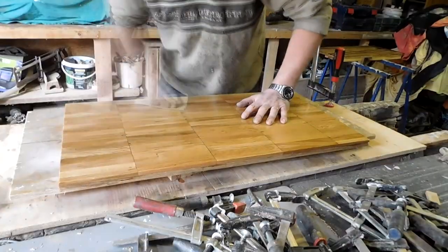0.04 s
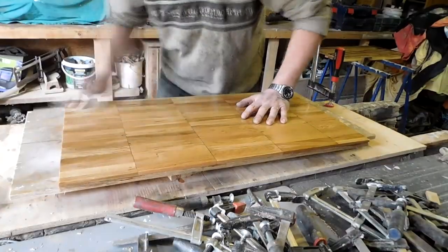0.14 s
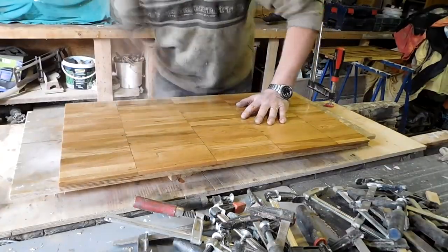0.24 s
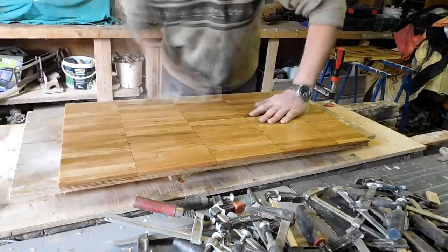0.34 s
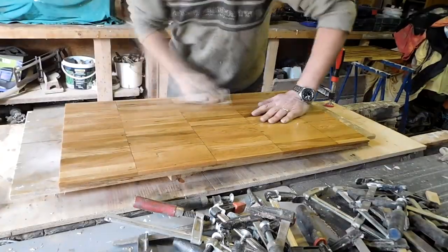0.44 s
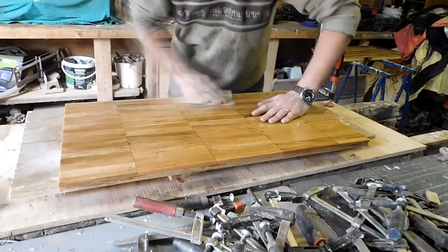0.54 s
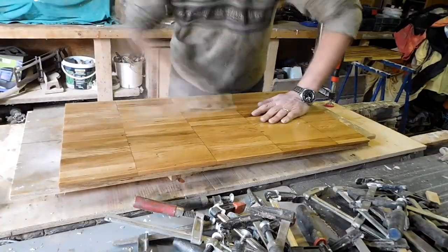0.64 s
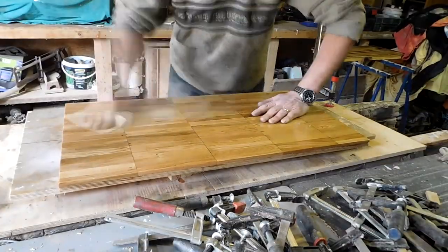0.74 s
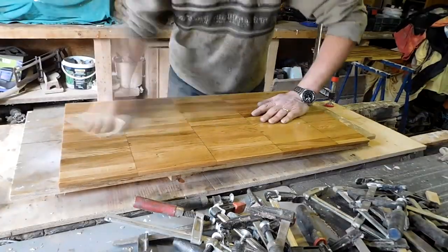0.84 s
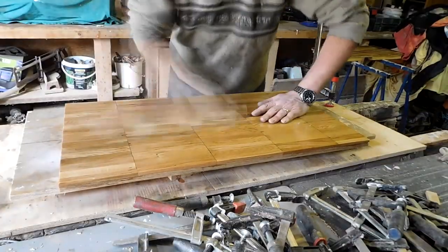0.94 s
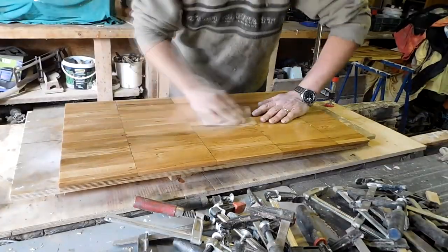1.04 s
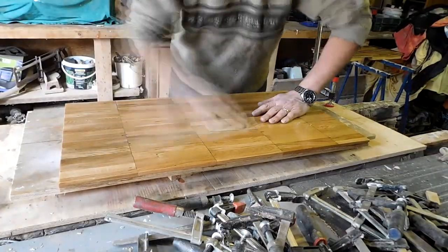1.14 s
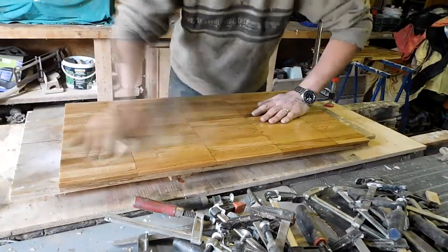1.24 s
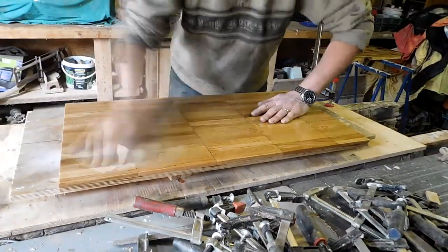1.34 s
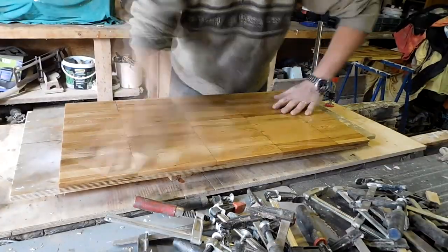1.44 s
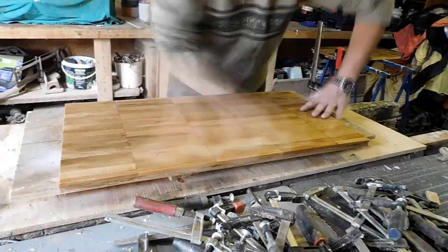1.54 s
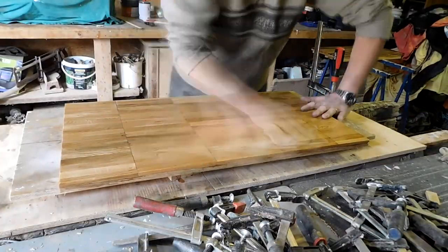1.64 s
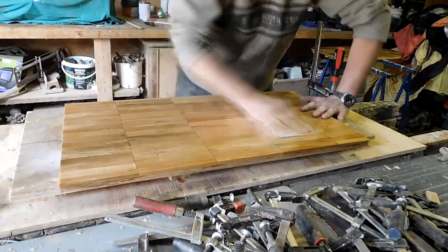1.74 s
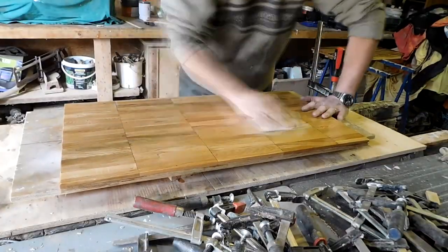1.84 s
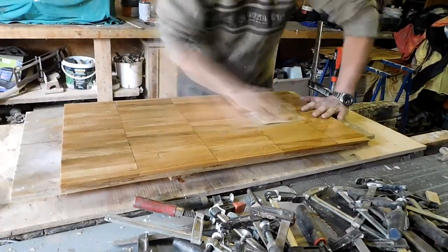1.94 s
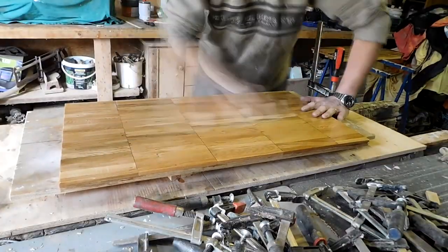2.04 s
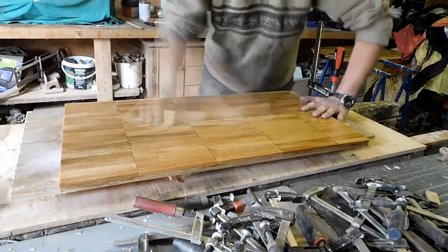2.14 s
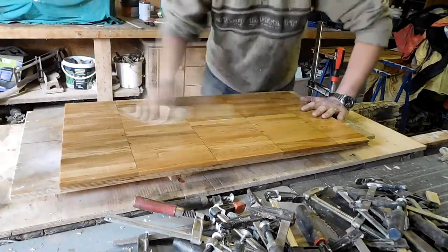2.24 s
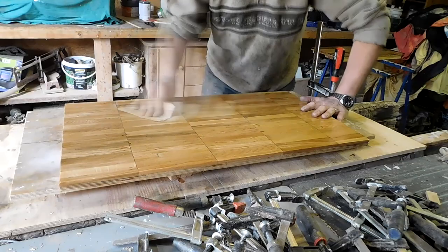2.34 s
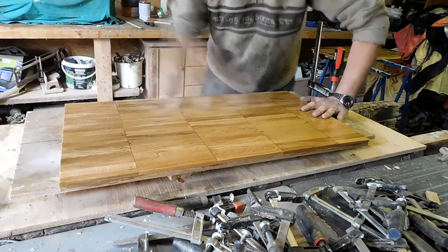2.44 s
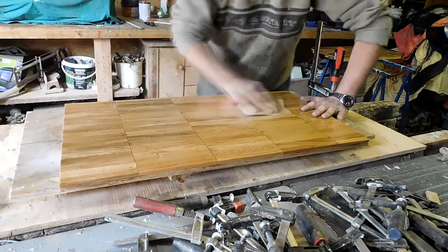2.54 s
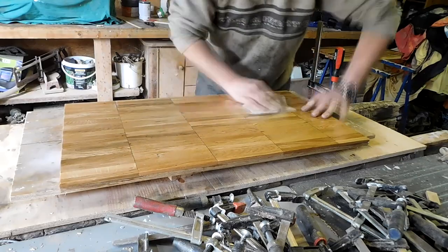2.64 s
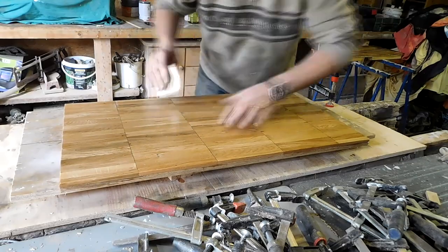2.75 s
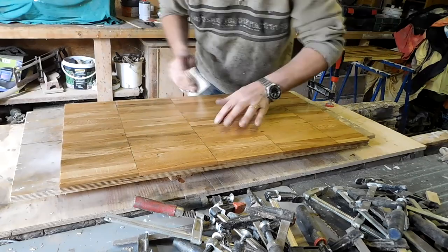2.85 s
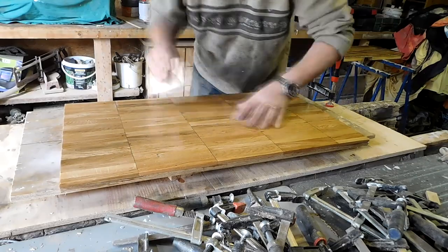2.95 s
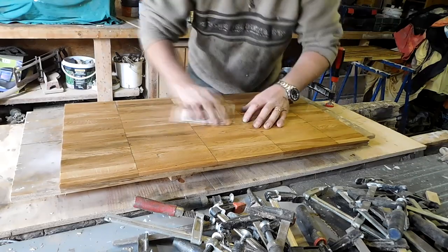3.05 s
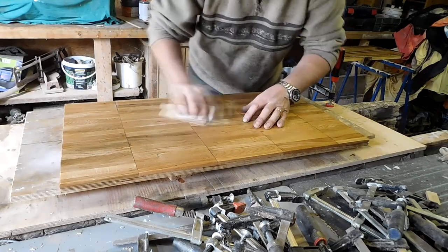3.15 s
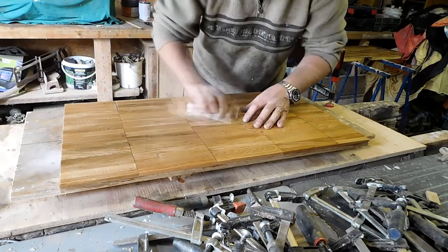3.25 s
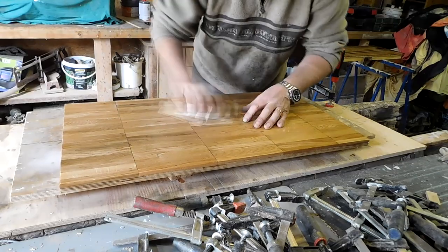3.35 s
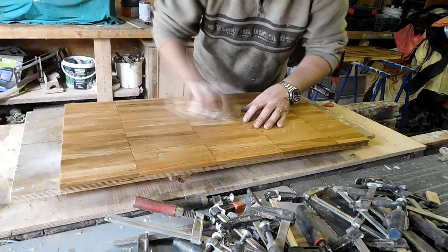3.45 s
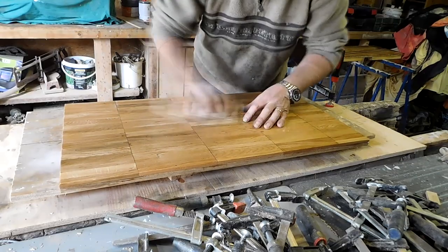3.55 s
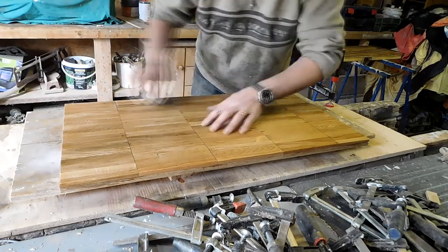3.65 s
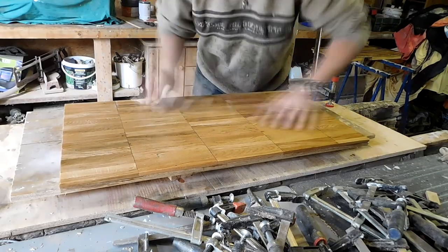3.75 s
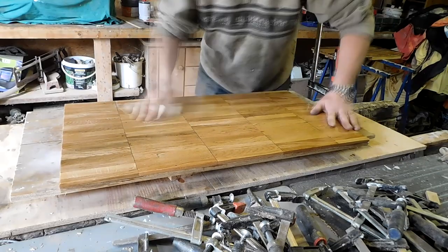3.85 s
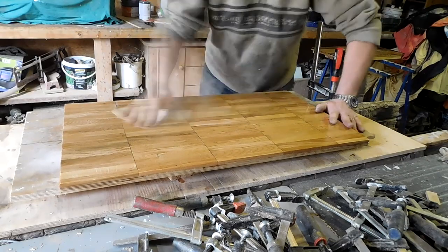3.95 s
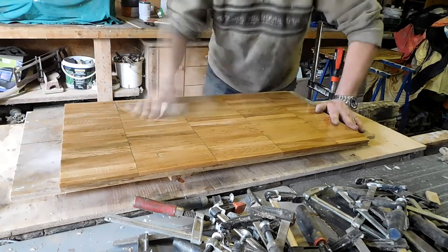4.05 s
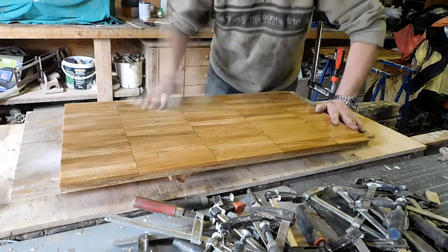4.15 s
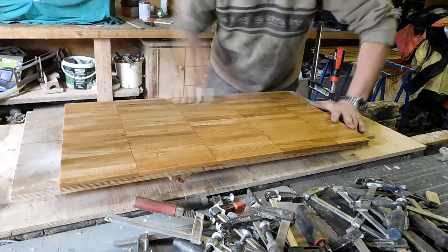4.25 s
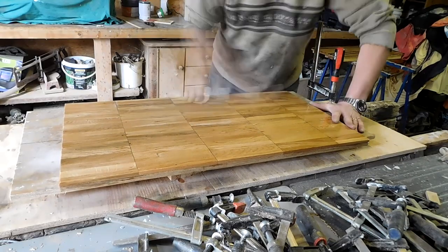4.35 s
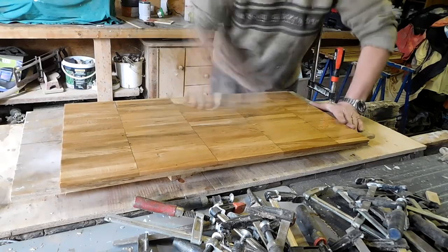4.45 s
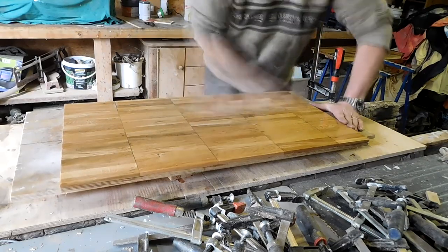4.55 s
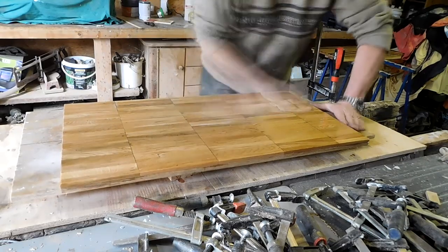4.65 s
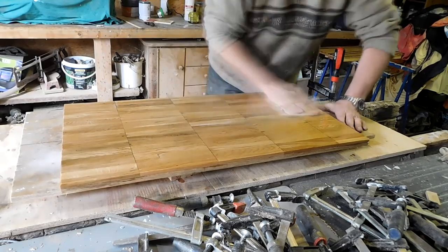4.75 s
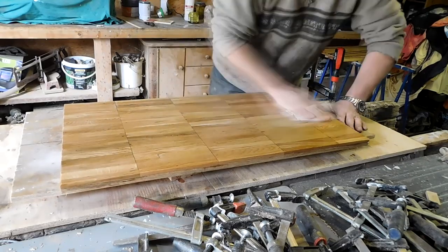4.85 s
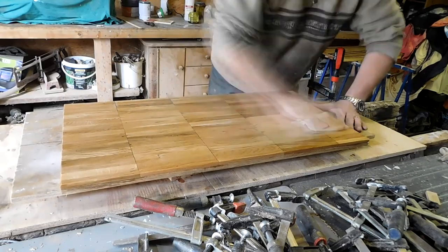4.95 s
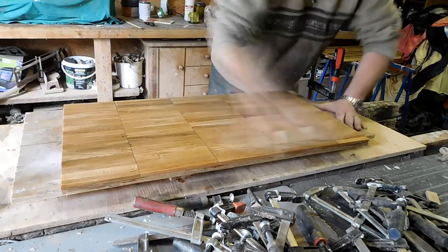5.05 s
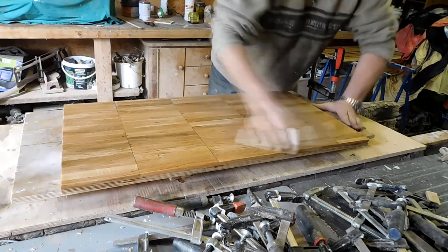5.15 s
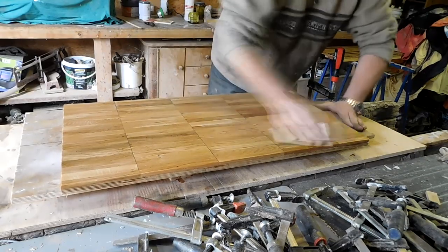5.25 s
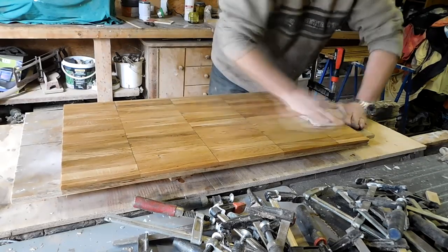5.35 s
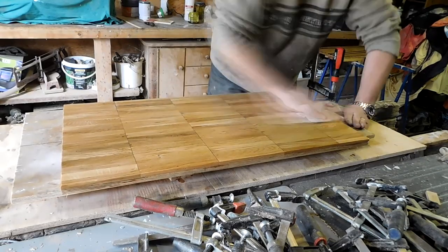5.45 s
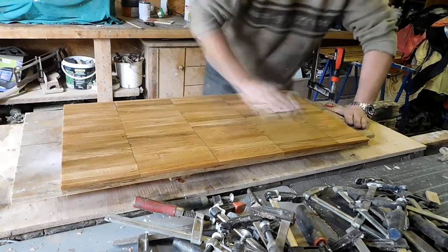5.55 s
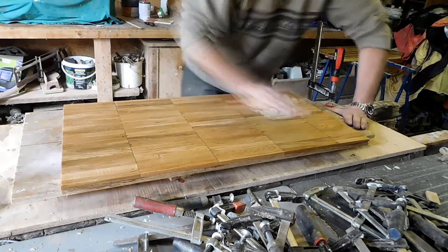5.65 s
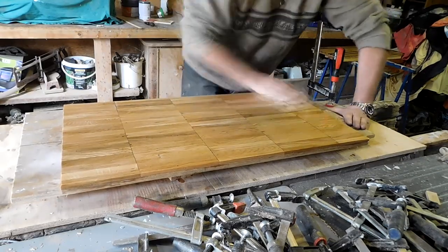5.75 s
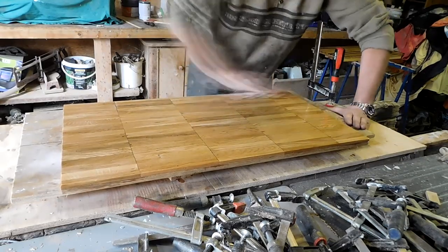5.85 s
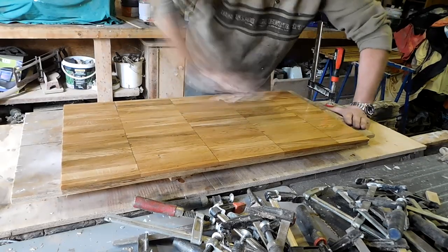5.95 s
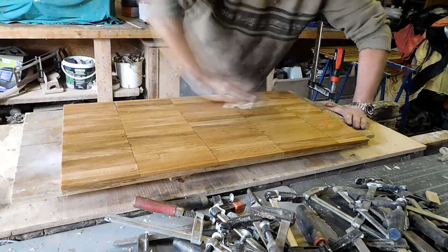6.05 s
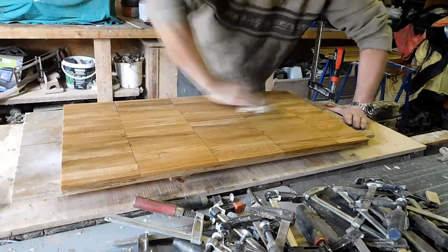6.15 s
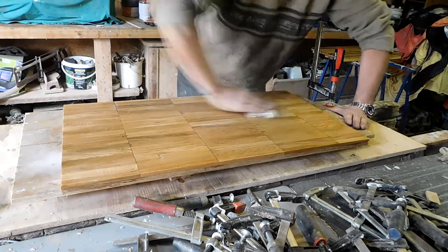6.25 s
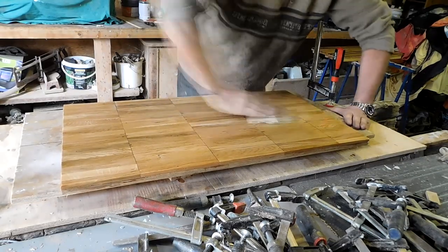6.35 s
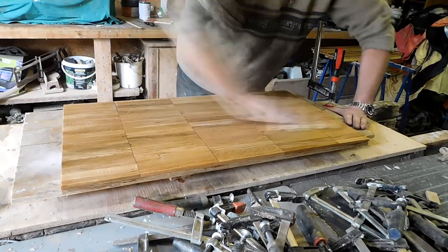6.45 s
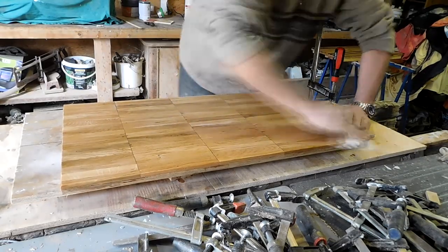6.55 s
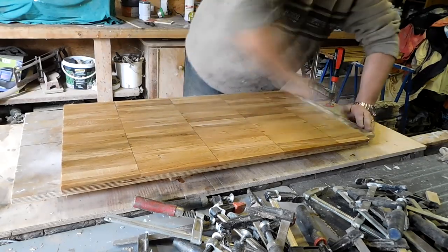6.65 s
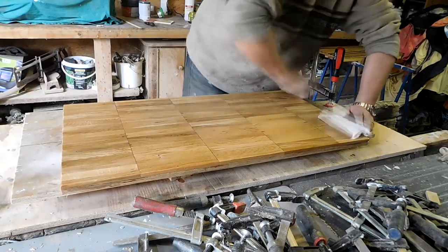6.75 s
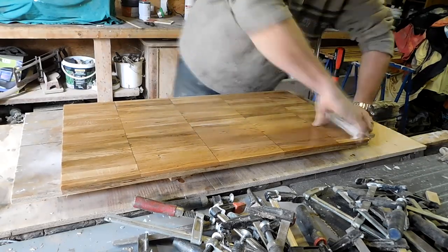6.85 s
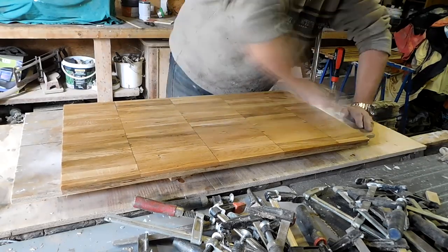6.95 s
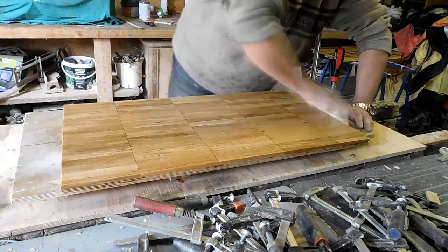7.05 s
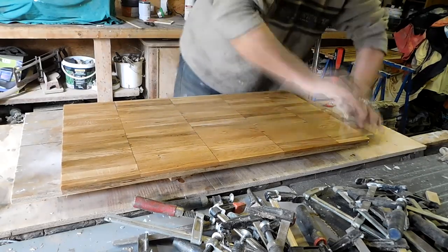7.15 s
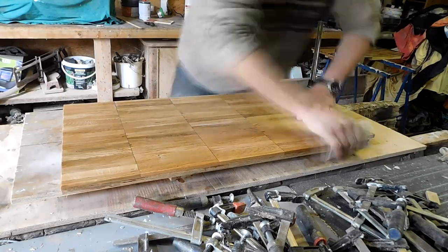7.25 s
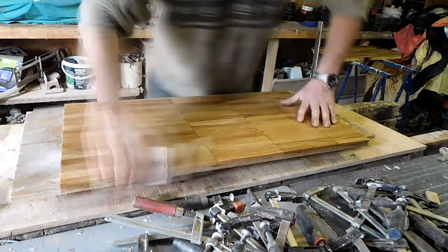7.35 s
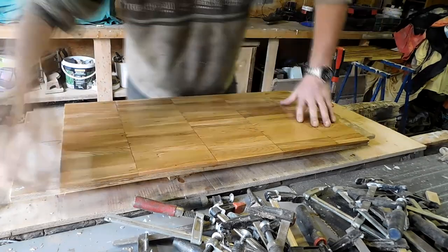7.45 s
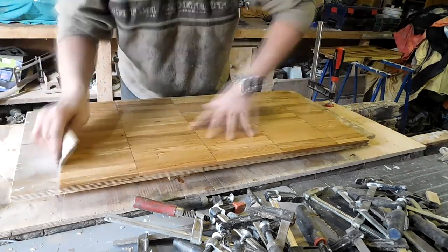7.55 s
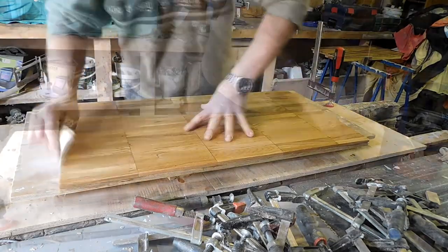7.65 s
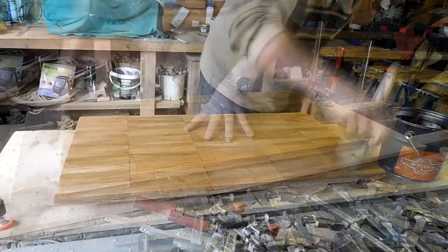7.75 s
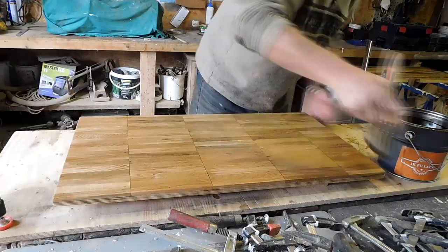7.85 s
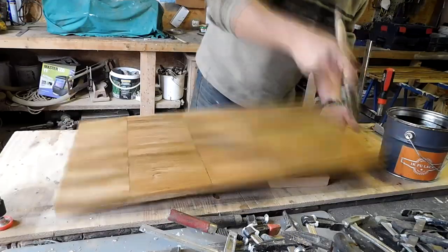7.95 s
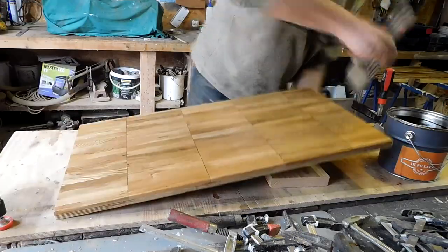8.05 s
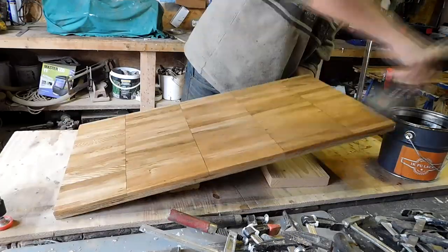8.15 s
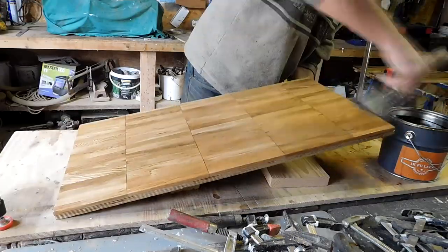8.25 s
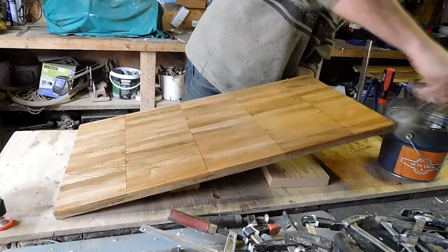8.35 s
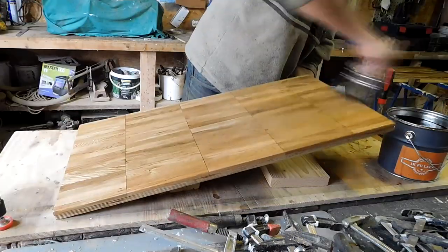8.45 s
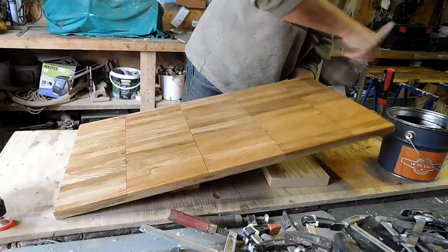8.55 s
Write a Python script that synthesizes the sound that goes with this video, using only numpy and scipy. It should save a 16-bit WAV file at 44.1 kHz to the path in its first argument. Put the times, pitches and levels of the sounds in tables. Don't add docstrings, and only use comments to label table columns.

```python
import sys
import numpy as np
from scipy import signal
from scipy.io import wavfile
from scipy.ndimage import uniform_filter1d

SR = 44100
rng = np.random.default_rng(int(sys.argv[2]) if len(sys.argv) > 2 else 0)


def master(y):
    cut = np.clip(np.atleast_2d(y).T, -1, 1)
    pcm = np.round(cut * 32767)
    wavfile.write(sys.argv[1], SR, pcm.astype(np.int16))


def amplitude_ratio(level_db):
    exponent = np.asarray(level_db, float) / 20
    return 10 ** exponent


N = 379260
HOP, SIZE = 64, 512
HZ = np.fft.rfftfreq(SIZE, 1 / SR)[:, None]
FRAME_S = np.arange(N // HOP + 2) * HOP / SR

# pitch_hz, likeness_0_to_1
LIKENESS = [(60, 0.85), (180, 0.28), (550, 0.53), (1650, 0.62), (4970, 0.62), (15000, 0.27)]


def evened(x):
    return x / np.sqrt(np.mean(np.abs(x) ** 2) + 1e-20)


def read(points):
    hz, value = np.transpose(points)
    return np.interp(np.log(HZ + 1), np.log(hz + 1), value)


def band_db(shape_db, lo_hz, hi_hz):
    in_band = (HZ > lo_hz) & (HZ < hi_hz)
    power = (amplitude_ratio(shape_db)[in_band] ** 2).sum() / len(HZ)
    return shape_db - 10 * np.log10(power)


def patches(patchy_db, wide_bins, long_frames):
    blotches = rng.standard_normal((len(HZ), len(FRAME_S)))
    blotches = uniform_filter1d(blotches, int(wide_bins), axis=0)
    blotches = uniform_filter1d(blotches, int(long_frames), axis=1)
    return patchy_db * evened(blotches)


def pair(field_db, likeness, lag_samples, spread_db):
    click_db = spread_db * np.minimum(rng.exponential(1, N), 3)
    clicks = evened(rng.standard_normal((2, N)) * amplitude_ratio(click_db))
    shared, own = signal.stft(clicks, nperseg=SIZE, noverlap=SIZE - HOP)[2]
    frames = shared.shape[1]
    likeness = np.clip(likeness, 0, 1)
    delay = np.exp(-2j * np.pi * HZ / SR * lag_samples)[:, :frames]
    left = shared * delay
    right = likeness * shared + np.sqrt(1 - likeness ** 2) * own
    coloured = np.array([left, right]) * amplitude_ratio(field_db)[..., :frames]
    return signal.istft(coloured, nperseg=SIZE, noverlap=SIZE - HOP)[1][:, :N]


def scrubbing():
    # turn_s, strokes_that_follow (0 = run ends)
    pace = [(0.0, 6), (0.227, 2), (0.314, 12), (0.845, 18), (1.595, 1), (1.654, 15), (2.341, 9), (2.738, 0),
            (3.24, 11), (3.615, 0), (3.881, 5), (4.135, 5), (4.376, 10), (4.841, 4), (5.026, 6), (5.288, 1),
            (5.366, 7), (5.628, 1), (5.734, 0), (5.785, 1), (5.885, 1), (5.958, 13), (6.561, 0)]
    # start_s, top_speed_hiss_db, turn_dip_db, far_turn_extra_dip_db, panel_db
    effort = [(0, -38.5, 3, 1, -45), (.27, -35.5, 7.5, -1.5, -48.5), (.6, -36.5, 8.5, 0.5, -47.5),
              (1.0, -37.5, 7.5, 0.4, -49.5), (1.55, -38, 8, -0.5, -50), (2.0, -36, 9, -0.5, -48),
              (2.7, -37, 8.5, 1, -50.5), (3.24, -49, 2, 0.5, -53), (3.6, -46, 10.5, 0, -54),
              (3.9, -34, 8.5, -1.5, -46), (4.35, -38.5, 7, -4, -51.5), (4.7, -39, 7, 0.5, -49.5),
              (4.9, -36.5, 7, -3.5, -51), (5.2, -43, 6, 0.5, -52), (5.4, -45.5, 9, 0, -54),
              (5.7, -42.5, 3, -0.5, -49), (6.15, -45, 7.5, 0, -53), (6.55, -45.5, 2.5, 0, -52.5)]
    far_early_s = 0.0032
    push_early = 0.041
    stroke_db, push_hiss_db, push_panel_db = 1, 0.8, 0.5

    runs = [np.linspace(start_s, end_s, count, endpoint=False)
            for (start_s, count), (end_s, _) in zip(pace, pace[1:])]
    turn_s = np.concatenate(runs)
    effort_s, *columns = np.transpose(effort)
    top_db, dip_db, far_db, panel_db = (np.interp(turn_s, effort_s, c) for c in columns)
    odd = -(-1.) ** np.arange(len(turn_s))
    chance_db = stroke_db * rng.standard_normal((3, len(turn_s)))
    push = np.clip(odd * far_db, -1, 1)
    return [turn_s - far_early_s * push * (turn_s > 0),
            top_db - dip_db - odd * far_db + chance_db[0],
            0.5 - push_early * push,
            top_db + push_hiss_db * push + chance_db[1],
            panel_db + push_panel_db * push + chance_db[2]]


def stroke_levels():
    # turn_s, turn_hiss_db,
    # top_speed_place_0_to_1, top_speed_hiss_db, panel_db
    wipes_and_lifts = [
        (2.738, -55, 0.28, -45.5, -55.5),
        (2.815, -82, 0.6, -96, -91),
        (3.04, -94, 0.54, -49.5, -49),
        (3.1, -64, 0.66, -53, -50),
        (3.145, -54, 0.63, -43.5, -46),
        (3.205, -47, 0.7, -42.5, -43.5),
        (3.615, -48.5, 0.34, -44, -55.5),
        (3.685, -71, .1, -71, -65.5),
        (3.748, -85, .8, -76, -68),
        (3.805, -79, 0.59, -38, -46.5),
                       (5.734, -46.5, 0.4, -45, -44.5), (6.561, -51, 0.24, -48, -52.5),
             (6.622, -56.5, 0.74, -41.5, -46.5), (6.717, -49.5, .42, -41.5, -48),
             (6.77, -49.5, 0.39, -45.5, -50), (6.85, -71, .5, -73, -64.5), (6.9, -74, 0.37, -61, -59.5),
             (6.961, -69, 0.69, -39, -45), (7.081, -46.5, 0.4, -39.5, -49.5),
             (7.131, -42.5, .4, -39.5, -49), (7.205, -62, .4, -63, -62), (7.252, -75, 0.37, -48, -46.5),
             (7.309, -71, 0.9, -38.5, -47), (7.36, -39, .45, -34.5, -49), (7.426, -45, .5, -40.5, -50.5),
             (7.472, -49.5, 0.46, -37.5, -46.5), (7.55, -61.5, 0.9, -52, -52),
             (7.625, -58, 0.63, -46, -47.5), (7.68, -55.5, .47, -44.5, -46.5), (7.739, -53, .4, -47, -49),
             (7.774, -50.5, 0.43, -39.5, -47), (7.875, -75, .3, -75, -67)]
    # turn_s, turn_hiss_db, top_speed_place_0_to_1, top_speed_hiss_db, panel_db
    brushes = [
        (7.97, -81, 0.6, -74, -62),
        (8.035, -76, .4, -56, -48),
        (8.115, -75, .2, -75, -67),
        (8.176, -78, 0.4, -72, -69.5),
        (8.299, -88, 0.6, -74, -73),
        (8.415, -86, 0.45, -77, -70.5),
        (8.5, -81, .3, -80, -72),
        (8.545, -82, 0.44, -60.5, -64.5),
    ]
    rows = np.hstack([scrubbing(), np.transpose(wipes_and_lifts + brushes)])
    turn_s, turn_db, place, top_db, panel_db = rows[:, np.argsort(rows[0])]
    length_s = np.diff(turn_s, append=N / SR + 0.02)
    top_s = turn_s + np.clip(place, 0.1, 0.9) * length_s
    knots_s = np.append(np.ravel([turn_s, top_s], "F"), N / SR + 0.017)
    step = np.interp(FRAME_S, knots_s, np.arange(len(knots_s)))
    stroke = step.astype(int) // 2
    slowing = step.astype(int) % 2
    end_db = np.append(turn_db, -72)[stroke + slowing]
    speed = np.abs(np.sin(np.pi / 2 * step)) ** 1.37
    dip_db = (top_db[stroke] - end_db) * (1 - speed)
    panel_db = panel_db[stroke] + 0.3 - np.maximum(0.67 * dip_db, dip_db - 22.0)
    return top_db[stroke] - dip_db, np.clip(dip_db, 0, 12), uniform_filter1d(panel_db, size=12)


def sanding():
    # start_s, treble_tilt_db_per_octave, paper_ring_db, palm_weight_db
    touch = [(0, 1.5, 5, -13.5), (.4, 2, 2, 0), (2.6, 1.5, 1, 2), (3.05, -3, -0.5, -7),
             (3.2, -3.5, 10, -21), (3.32, -3, 1, -12), (3.65, -2, -2, 3), (3.85, 2.5, 1.5, -5),
             (4.3, 1, -1, 7), (5.1, 2, 1, 6), (5.75, 0.5, 2, -2), (6.3, 0, 1, 8), (6.7, 1, 3.5, 0),
             (7, 1.5, 2, -5), (7.29, -3, -1, 8.5), (7.55, 2, 3, 2.5), (7.85, -1.5, 0.5, 2),
             (8.3, 5.5, 10, 1)]
    # start_s, left_lag_samples
    hand = [(0, -1.3), (1.3, -0.72), (2, -1.5), (4, 0), (5, 1.2), (6.7, 1.7), (7.2, 2.5), (7.6, -2.5),
            (8.3, -2.4)]
    # pitch_hz, level_db
    grit_shape = [(500, -36.5), (900, -13), (1500, -8.5), (2200, -0.5), (4100, -1.5), (8500, -7.5),
                  (14800, -18.5), (16000, -23.5)]
    # start_s, pitch_hz
    paper = [(0, 1620), (.45, 2300), (3.1, 2100), (3.24, 1510), (3.5, 2280), (5.9, 2720)]
    # pitch_hz, level_db
    panel_shape = [(30, -27), (75, -22.5), (130, -23.5), (300, -18.5), (600, -8.5), (1200, -6),
                   (1800, -5.5), (3000, -14), (6000, -60.5)]
    # pitch_hz, width_hz, level_db
    panel_rings = [(426, 84, 4.5), (750, 92, 4.5), (1171, 148, 6), (1358, 67, 2.5)]
    # pitch_hz, left_minus_right_db
    lean = [(60, 1), (180, 1.5), (550, 1), (1650, -0.5), (4970, -1), (15000, 3.5)]
    paper_width_octaves = 0.42

    hiss_db, dip_db, panel_level_db = stroke_levels()
    touch_s, *columns = np.transpose(touch)
    tilt_db, paper_db, palm_db = (np.interp(FRAME_S, touch_s, c) for c in columns)
    lag_samples = np.interp(FRAME_S, *np.transpose(hand))

    octaves = np.log2((HZ + 50) / 5000)
    grit_db = band_db(read(grit_shape), 2830, 15000) + hiss_db
    grit_db = grit_db + (tilt_db - 0.2 * dip_db) * octaves
    paper_hz = np.interp(FRAME_S, *np.transpose(paper))
    off_ring = np.log2((HZ + 1) / paper_hz) / paper_width_octaves
    grit_db = grit_db + paper_db * np.exp(-off_ring ** 2) + patches(0.79, 7.4, 24)

    rings_db = sum(db / (1 + (2 * (HZ - hz) / width_hz) ** 2) for hz, width_hz, db in panel_rings)
    panel_db = band_db(read(panel_shape) + rings_db, 300, 1500) + panel_level_db
    panel_db = panel_db - 0.26 * lag_samples * (FRAME_S < 7.3) * (rings_db - 3.0)
    panel_db = panel_db + patches(1.76, 3, 40)
    panel_db = panel_db + palm_db / (1 + (HZ / 346.0) ** 2)

    dust_db = band_db(0 * HZ, 3000, 14000) + 0.8 * uniform_filter1d(hiss_db, size=20) - 26.0
    dust_db = dust_db + 20 * np.log10(HZ / SR * 4 + 1e-3)

    sum_db = 10 * np.log10(amplitude_ratio(2 * grit_db) + amplitude_ratio(2 * panel_db) + amplitude_ratio(2 * dust_db))
    side_db = (read(lean) - 0.5 * lag_samples - 0.2) / 2
    field_db = np.array([sum_db + side_db + 0.81, sum_db - side_db + 0.9])
    return pair(field_db, read(LIKENESS) + 0.22, lag_samples, spread_db=1.0)


def murmur():
    # pitch_hz, level_db
    room = [(24, -69), (40, -34), (231, -27), (372, -6.5), (422, -10), (600, -6), (646, -16), (697, -5),
            (1850, -9), (4460, -37.5), (16000, -33.5)]
    air = pair(read(room) + patches(1.3, 6, 30), read(LIKENESS), 0 * FRAME_S, spread_db=3.5)
    return amplitude_ratio(-68.5) * evened(air)


def ring(hz, db, t60_s):
    t_s = np.arange(6000) / SR
    return amplitude_ratio(db - 60 * t_s / t60_s) * np.sin(2 * np.pi * hz * t_s)


def swell():
    return np.sin(np.pi / 2 * np.minimum(np.arange(6000) / SR / 0.0034, 1)) ** 2


def bumps():
    # start_s, level_db, pitch_hz, t60_s
    palm_bumps = [
        (1.61, -52, 95, 0.091),
        (2.091, -52, 79, 0.2),
        (4.565, -54, 108, 0.09),
        (5.735, -69, 102, 0.22),
        (6.1, -49, 92, 0.085),
    ]
    out = np.zeros(N)
    for start_s, db, hz, t60_s in palm_bumps:
        bump = swell() * (ring(hz, db, t60_s) + ring(7.3 * hz, -47.5, 1.1 * t60_s))
        out[round(start_s * SR):][:len(bump)] += bump
    return out


def shudder():
    # start_s, level_db
    tremble = [
        (7.33, -78),
        (7.4, -69),
        (7.7, -68),
        (7.85, -83),
    ]
    level_db = np.interp(np.arange(N) / SR, *np.transpose(tremble), -120, -120)
    band = signal.butter(2, [110 - 8, 110 + 8], "band", fs=SR, output="sos")
    return amplitude_ratio(level_db) * evened(signal.sosfilt(band, rng.standard_normal(N)))


def rattle():
    # pitch_hz, level_db, t60_s
    modes = [(102, -29, 0.068), (180, -41, 0.045), (304, -18, 0.038), (343, -15.5, 0.09), (391, -10, 0.067),
             (454, -10, 0.051), (562, -13, 0.082), (742.5, -3.5, 0.065), (837, 1.5, 0.047),
             (950, -0.5, 0.034), (1115, 8.5, 0.02), (1450, 5, 0.032), (1813, 3.5, 0.053),
             (2280, 4.5, 0.041)]
    # start_s, level_db, hardness_hz
    blows = [(7.997, -42, 318), (8.003, -36.5, 360), (8.01, -36, 360), (8.046, -20, 1500),
             (8.05, -17.5, 1300), (8.061, -17, 1100), (8.068, -20.5, 1000), (8.073, -16, 1000),
             (8.078, -24, 900), (8.087, -31, 890), (8.096, -44, 800), (8.104, -52, 810)]
    out = np.zeros(N)
    for start_s, db, hard_hz in blows:
        blow = 0
        for hz, mode_db, t60_s in modes:
            detune = rng.uniform(0.94, 1.06)
            side = rng.choice([-1, 1])
            blow = blow + side * ring(hz * detune, mode_db, t60_s) / (1 + (hz / hard_hz) ** 3.2)
        buzz = uniform_filter1d(rng.standard_normal(len(blow)), size=30)
        buzz = evened(uniform_filter1d(buzz, size=9))
        blow = swell() * blow * (1 + 0.33 * buzz)
        out[round(start_s * SR):][:len(blow)] += amplitude_ratio(db) * blow / np.abs(blow).max()
    return out


def walls(x):
    t_s = np.arange(5000) / SR
    tail = rng.standard_normal((2, len(t_s))) * amplitude_ratio(-60 * t_s / 0.096) * (t_s > 0.003)
    tail = signal.lfilter([1], [1, -0.3], tail)
    return signal.fftconvolve(x, tail / np.linalg.norm(tail[0]), axes=1)[:, :N]


def scene():
    near = sanding() + bumps() + rattle()
    return near + amplitude_ratio(-13) * walls(near) + shudder() + murmur()


def band_limit(x):
    return signal.sosfilt(signal.butter(12, 16190, fs=SR, output="sos"), x)


def record(dry):
    heard = signal.sosfilt(signal.butter(2, 150., "high", fs=SR, output="sos"), dry)
    heard = signal.oaconvolve(heard, signal.firwin(511, 15780, fs=SR)[None], "same")
    return band_limit(heard)


dry = scene()
out = record(dry)
master(out)
```